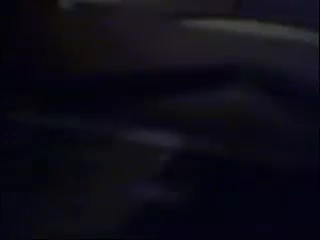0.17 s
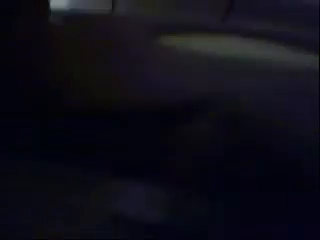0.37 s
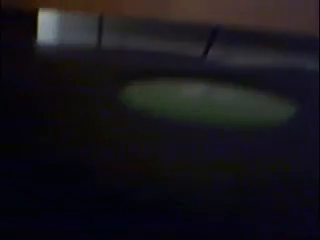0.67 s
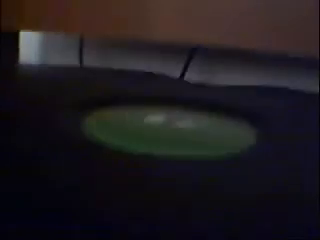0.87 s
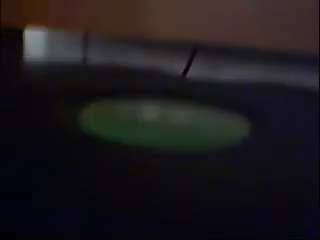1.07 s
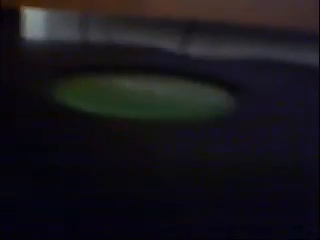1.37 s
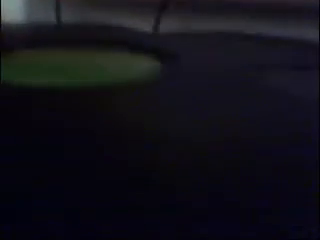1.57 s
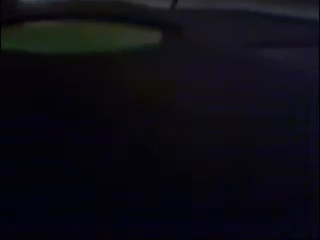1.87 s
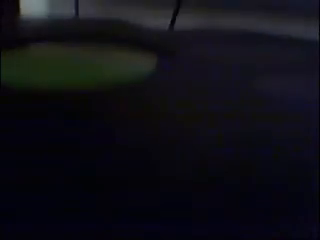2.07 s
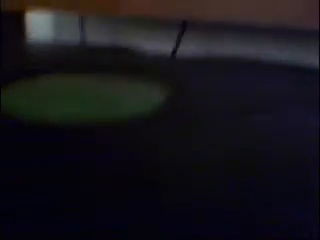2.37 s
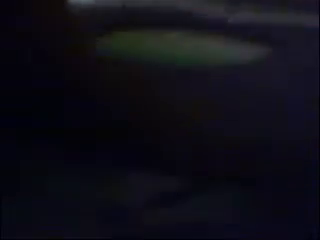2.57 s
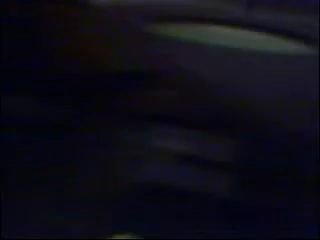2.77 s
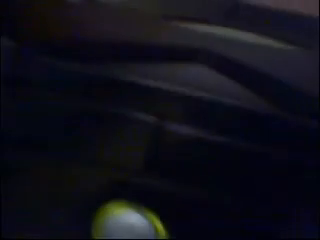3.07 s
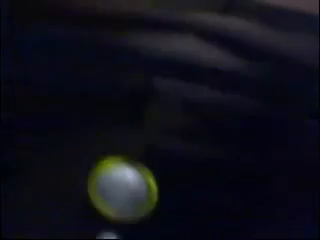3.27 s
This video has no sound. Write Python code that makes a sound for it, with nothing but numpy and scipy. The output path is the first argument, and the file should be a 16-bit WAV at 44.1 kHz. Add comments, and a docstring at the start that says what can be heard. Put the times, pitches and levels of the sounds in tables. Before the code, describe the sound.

Cooling fan inside a game console, microphone almost against the vents: deep rumbling surges and soft puffs, hum and thin whine, faint disc drive rattle, then rising pitch and stronger airflow towards the end.

```python
"""Air buffets the microphone in low, gusty surges, held very close to the cooling fan of a game console.
Behind it the blades hum and whine through the case; a little after two seconds the fan speeds up.
Air rushes out of the vents as broad noise, and a faint dry chatter, probably the disc drive, runs underneath.
Tones are sines, mostly tied to one shaft rate; air and chatter are filtered noise."""
import sys
import numpy as np
from scipy import signal
from scipy.fft import rfft, irfft, next_fast_len
from scipy.io import wavfile
from scipy.ndimage import uniform_filter1d

SR = 44100
rng = np.random.default_rng(int(sys.argv[2]) if len(sys.argv) > 2 else 0)


def store_wav(level_fs):
    """Save 16-bit WAV to argv[1]."""
    pcm = np.round(np.clip(np.atleast_2d(level_fs), -1, 1) * 32767)
    wavfile.write(sys.argv[1], SR, pcm.T.astype(np.int16))


N = 151263
T = np.arange(N) / SR  # time [s]

# All "spectrum" tables give relative density; the noise shaped by them is then scaled to rms 1.
# Thin whines of the drive and the electronics, fixed in pitch: [f/Hz, level before waver/dB]
WHINES = [(2168, -67.5), (3079, -70.5), (3468, -71), (3505, -79), (4059, -73.5), (4338, -81.5), (4672, -77),
          (5061, -78), (5641, -77.5), (6320, -86), (6460, -80), (7047, -87), (8952, -84), (10477, -79.5),
          (10550, -82), (10869, -90)]
# Drive chatter over time: [t/s, bursts per second, level/dB]
CHATTER = [(0, 45, -76), (.13, 42, -62), (.2, 42, -55.5), (.7, 42.4, -54.5), (1.4, 43.4, -54.5),
           (1.75, 43, -53.5), (2.0, 38, -54), (2.3, 35, -54), (2.6, 28.4, -56.5), (3.0, 41.5, -54),
           (3.35, 37, -53)]
# Ring of each chatter burst, spectrum: [f/Hz, level/dB per Hz]
CHATTER_RING = [(1500, -24), (3000, -5), (3800, -14.5), (3920, -.5), (4080, 2.5), (4230, -11.5),
                (4330, 3.5), (4470, -14), (4630, -3.5), (5000, -14), (5700, -10.5), (6400, -25.5),
                (7200, -27), (12000, -55)]
# Deep wind rumble on the microphone, spectrum: [f/Hz, level/dB per Hz]
RUMBLE_SPECTRUM = [(8, 2.5), (18, 0.5), (28, 1.5), (42, 0.5), (65, 2.3), (85, -1.5), (102, -10.5),
                   (140, -22.5), (400, -69.5), (5000, -150)]
# Surges of the rumble, before its trim: [t/s, level/dB]
RUMBLE_LEVEL = [(0.0, -18.8), (0.15, -17.0), (0.18, -19.5), (0.63, -22.6), (0.67, -26.8), (0.76, -19.0),
                (0.82, -21.3), (0.91, -18.0), (1.16, -21.6), (1.38, -19.1), (1.45, -21.2), (1.55, -16.8),
                (1.65, -22.1), (1.97, -19.1), (2.02, -24.7), (2.07, -18.1), (2.13, -22.9), (2.2, -19.2),
                (2.3, -22.1), (2.34, -18.0), (2.51, -23.3), (2.54, -19.3), (2.63, -16.3), (2.79, -20.9),
                (2.91, -17.7), (3.1, -24.5), (3.15, -17.0), (3.27, -17.7), (3.32, -22.3), (3.43, -15.8)]
# Quicker wind flutter on the microphone, spectrum: [f/Hz, level/dB per Hz]
FLUTTER_SPECTRUM = [(45, -42), (78, -11), (96, 0), (125, -2.5), (155, -5.5), (200, -11.5), (280, -21),
                    (400, -28), (600, -46), (1200, -78), (5000, -110)]
# Surges of the flutter, before its trim: [t/s, level/dB]
FLUTTER_LEVEL = [(0.0, -22.0), (0.07, -18.9), (0.14, -24.4), (0.18, -20.7), (0.24, -27.4), (0.3, -18.9),
                 (0.45, -26.0), (0.48, -22.5), (0.63, -25.7), (0.66, -21.0), (0.83, -25.1), (0.86, -20.6),
                 (1.09, -22.8), (1.13, -18.6), (1.23, -24.0), (1.26, -16.1), (1.31, -24.9), (1.42, -22.4),
                 (1.47, -23.4), (1.57, -17.0), (1.61, -22.1), (1.74, -23.3), (1.77, -28.8), (1.8, -22.4),
                 (1.91, -21.2), (2.04, -25.3), (2.11, -19.3), (2.15, -23.4), (2.27, -23.3), (2.3, -27.5),
                 (2.34, -19.3), (2.41, -17.0), (2.44, -27.2), (2.53, -26.6), (2.66, -19.9), (2.71, -23.5),
                 (2.82, -18.0), (2.88, -24.9), (2.91, -18.9), (3.09, -25.3), (3.17, -17.3), (3.28, -25.1),
                 (3.35, -19.6), (3.43, -19.4)]
# Sharper puffs of air on the microphone: [centre t/s, length/s, peak level/dB]
PUFFS = [(0.106, .03, -36), (0.269, 0.05, -28), (0.749, 0.043, -19), (.908, .038, -28), (1.024, 0.045, -25),
         (1.553, 0.044, -22.5), (1.898, .03, -22.5), (2.071, .02, -15.5), (2.161, .022, -23),
         (2.228, .028, -23.5), (2.367, 0.064, -26.5), (2.613, 0.04, -24), (2.691, 0.046, -23),
         (2.938, .08, -22), (3.064, .02, -18.5), (3.167, 0.096, -23.5), (3.349, 0.022, -21.5),
         (3.404, 0.035, -27.5)]
# Puffs, spectrum: [f/Hz, level/dB per Hz]
PUFF_SPECTRUM = [(40, -35), (130, -3), (190, 2.5), (270, -6), (350, -19), (600, -29.5), (1200, -52.5),
                 (5000, -100)]
# Air rushing through the vents, spectrum: [f/Hz, level/dB per Hz]
RUSH_SPECTRUM = [(100, 5.5), (300, 6.5), (480, 2), (640, 0), (790, -4.5), (880, -1.6), (1020, -4.5),
                 (1160, -3.5), (1370, -6), (1550, -9.5), (1750, -9), (2000, -10), (2160, -11.5),
                 (2380, -13.5), (2520, -11.5), (2780, -16), (3150, -15.5), (3700, -17.5), (4050, -16.5),
                 (4700, -21), (5200, -24), (6050, -25.5), (6380, -22.5), (6650, -27.5), (7300, -31.5),
                 (9000, -32.5), (10100, -36), (10550, -33.5), (11300, -41), (12800, -41)]
# Swell of the body of the rush as the microphone nears a vent: [t/s, gain/dB]
NEAR_VENT = [(0, -0.4), (2.2, 0.26), (2.85, 0.3), (3.15, 1), (3.43, 1)]
# Hum of the passing blades: [t/s, level/dB]
HUM_LEVEL = [(0, -39), (.35, -41.5), (.6, -41.5), (1.2, -44.3), (1.45, -41), (1.68, -43.3), (1.9, -41),
             (2.2, -41.7), (2.4, -39.7), (3.1, -37.7), (3.43, -39)]
# Higher fan tones, levels before cavity lift and waver:
# [multiple of the shaft rate (rounded in use), idle level/dB, full-speed level/dB]
TONES = [(27, -63.5, -58), (32, -66, -53), (34, -66.5, -62), (36, -57, -53.5), (40, -64.5, -73),
         (58, -80.5, -68), (60, -70, -58), (62, -72, -70), (63.06, -72.5, -79), (63.6, -66, -72),
         (76, -76, -72)]
# Resonant cavities of the case: [f/Hz, width/Hz, lift/dB]
CAVITIES = [(1369, 130, 6.5), (2476, 48, 12.5)]

CHATTER_RISE_S, CHATTER_DECAY_S = 0.016, 0.0055
CHATTER_JITTER, CHATTER_SPREAD_DB = 0.12, 0.2  # rms unevenness: relative rate, strength

RUMBLE_TRIM_DB, FLUTTER_TRIM_DB, FLUTTER_PATCH_DB = 0.9, 0.05, 2.1
# the flow is even over these spans; faster flutter stays
RUMBLE_STEADY_S, FLUTTER_STEADY_S, PUFF_STEADY_S = 0.11, 0.088, 0.07
# shared eddies shake the rumble and flutter together, and the rush a little
EDDY_DB, EDDY_RUSH_DB = 2.0, 0.48

RUSH_DB, RUSH_PATCH_DB = -35.5, 0.5  # level at idle before the vent swell, unevenness
# rise at full speed below and above the split
RUSH_SPEED_DB, HISS_SPEED_DB, HISS_FROM_HZ = 2.5, 1.5, 1740

IDLE_HZ, SAG_HZ_PER_S = 39.89, 0.08  # shaft rate at the start, slow sag until the speed-up
SPEED_UP_S, SPEED_UP_HZ, SPIN_UP_S = 2.21, 4.72, 0.68  # start, full rise, time constant
WOBBLE = 0.00034  # relative unsteadiness of the shaft rate, rms
BLADES = 9
TONE_WAVER_DB = 1.04

EDGE_HZ = 12800  # upper limit of the recorder


def amp(db):
    """Decibels to gain."""
    return 10 ** (np.asarray(db) / 20)


def unit(x):
    """Scales to rms 1."""
    return x / np.sqrt(np.mean(x ** 2) + 1e-20)


def curve(table, axis=1):
    """One column of a time table, joined by straight lines."""
    table = np.array(table)
    return np.interp(T, table[:, 0], table[:, axis])


def colour(x, spectrum):
    """Filters x by a spectrum table, joined over log frequency, and scales to rms 1."""
    hz, db = np.transpose(spectrum)
    size = next_fast_len(N)
    f = np.fft.rfftfreq(size, 1 / SR)
    gain = amp(np.interp(np.log(f + 1), np.log(hz), db))
    return unit(irfft(rfft(x, size) * gain, size)[:N])


def drift(rate_hz):
    """Random wander of rms 1: sines from a tenth of the rate up to it, the slower ones stronger."""
    f = rate_hz * np.geomspace(1 / 10, 1, num=16)[:, None]
    coarse_t = T[::128]
    waves = np.sin(2 * np.pi * (f * coarse_t + rng.random(f.shape))) / np.sqrt(f)
    return np.interp(T, coarse_t, unit(waves.sum(0)))


def turbulence(spectrum, patch_db):
    """Coloured noise whose level is uneven in small patches of time and frequency."""
    z = signal.stft(rng.standard_normal(N), nperseg=512)[2]
    patches = rng.standard_normal(z.shape)
    patches = uniform_filter1d(patches, size=5, axis=0)  # across frequency
    patches = unit(uniform_filter1d(patches, size=7, axis=1))  # across time
    uneven = signal.istft(z * amp(patch_db * patches))[1][:N]
    return colour(uneven, spectrum)


def steadied(x, span_s):
    """Evens out the swells of a noise that are slower than the span and keeps its flutter."""
    window = np.hanning(round(span_s * SR))
    weight = signal.fftconvolve(np.ones(N), window, "same")  # corrects the window at both ends
    power = signal.fftconvolve(x ** 2, window, "same") / weight
    return unit(x / np.sqrt(abs(power) + 1e-9))


def whines(waver_db=4.5, smear_rad=0.66):
    """Thin whines of fixed pitch from drive and electronics that waver clearly in level and phase."""
    out = np.zeros(N)
    for hz, db in WHINES:
        level = amp(db + waver_db * drift(rate_hz=8.3))
        phase = 2 * np.pi * hz * T + smear_rad * drift(rate_hz=9.1)
        out += level * np.sqrt(2) * np.sin(phase)
    return out


def drive_chatter():
    """Short scratchy noise bursts, about forty a second, slightly uneven in timing and strength."""
    rate = curve(CHATTER, axis=1)
    cycles = np.cumsum(rate * (1 + CHATTER_JITTER * drift(rate_hz=33))) / SR
    age = cycles % 1 / rate  # approximate seconds since the burst began
    strength = amp(CHATTER_SPREAD_DB * rng.standard_normal(N))[cycles.astype(int)]
    bursts = strength * (1 - np.exp(-age / CHATTER_RISE_S)) * np.exp(-age / CHATTER_DECAY_S)
    return amp(curve(CHATTER, axis=2)) * colour(bursts * rng.standard_normal(N), CHATTER_RING)


def vent_rush(effort):
    """Broad air noise from the vents; its body grows with fan speed more than its hiss."""
    air = turbulence(RUSH_SPECTRUM, RUSH_PATCH_DB)
    lowpass = signal.butter(2, HISS_FROM_HZ, fs=SR, output="sos")
    body = signal.sosfiltfilt(lowpass, air)
    hiss = air - body
    body_gain = amp(RUSH_SPEED_DB * effort + curve(NEAR_VENT))
    hiss_gain = amp(HISS_SPEED_DB * effort)
    return amp(RUSH_DB) * (body_gain * body + hiss_gain * hiss)


def buffeting(eddy):
    """The airflow rumbles and flutters on the microphone in separate surges, with sharper puffs."""
    eddies = amp(EDDY_DB * eddy)
    rumble = steadied(colour(rng.standard_normal(N), RUMBLE_SPECTRUM) * eddies, RUMBLE_STEADY_S)
    rumble *= amp(RUMBLE_TRIM_DB + curve(RUMBLE_LEVEL))
    flutter = steadied(turbulence(FLUTTER_SPECTRUM, FLUTTER_PATCH_DB) * eddies, FLUTTER_STEADY_S)
    flutter *= amp(FLUTTER_TRIM_DB + curve(FLUTTER_LEVEL))
    puff_level = sum(amp(db) * np.exp(-(2 * (T - s) / length) ** 2) for s, length, db in PUFFS)
    puffs = puff_level * steadied(colour(rng.standard_normal(N), PUFF_SPECTRUM), PUFF_STEADY_S)
    return rumble + flutter + puffs


def fan_tones(effort):
    """Multiples of the shaft rate; the higher ones swell as they slide through a cavity of the case."""
    shaft = IDLE_HZ - SAG_HZ_PER_S * np.minimum(T, SPEED_UP_S) + SPEED_UP_HZ * effort
    shaft *= 1 + WOBBLE * drift(rate_hz=5.76)
    turns = np.cumsum(shaft) / SR
    out = amp(curve(HUM_LEVEL)) * np.sin(2 * np.pi * BLADES * turns)
    for multiple, idle_db, fast_db in TONES:
        k = round(multiple)
        lift = sum(lift_db / (1 + (2 * (k * shaft - hz) / width) ** 2)
                   for hz, width, lift_db in CAVITIES)
        db = idle_db + (fast_db - idle_db) * effort + lift + TONE_WAVER_DB * drift(rate_hz=11)
        out += amp(db) * np.sin(2 * np.pi * (k * turns + rng.random()))
    return np.sqrt(2) * out  # table levels are rms


def scene():
    """The fan idles, then eases towards a higher speed, very close to the microphone."""
    effort = 1 - np.exp(-np.maximum(T - SPEED_UP_S, 0) / SPIN_UP_S)  # 0 idle, 1 full speed
    eddy = drift(rate_hz=75)
    rush = amp(EDDY_RUSH_DB * eddy) * vent_rush(effort)
    mix = whines() + drive_chatter() + rush + buffeting(eddy) + fan_tones(effort)
    return mix[None]  # one channel


def record(dry):
    """The band limit of the recorder: a steep low-pass."""
    lowpass = signal.firwin(511, EDGE_HZ, window=("kaiser", 9), fs=SR)
    return signal.oaconvolve(dry, lowpass[None], "same")


dry = scene()
out = record(dry)
store_wav(out)
```